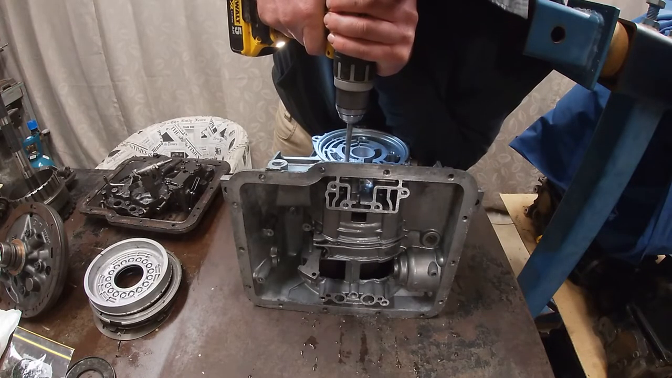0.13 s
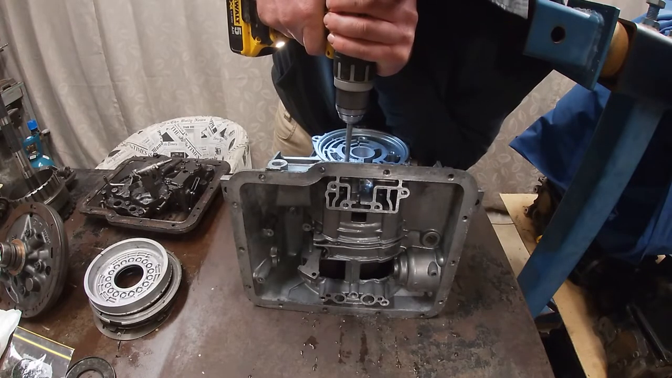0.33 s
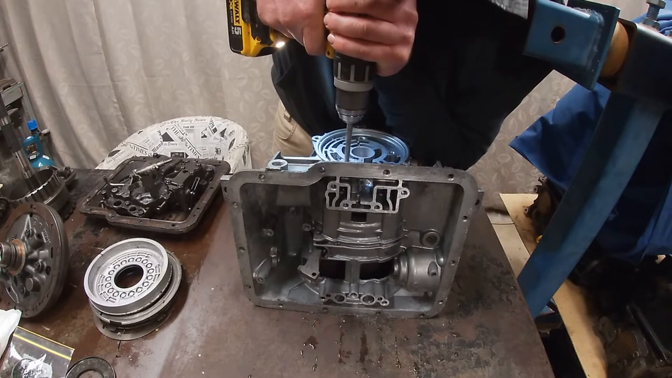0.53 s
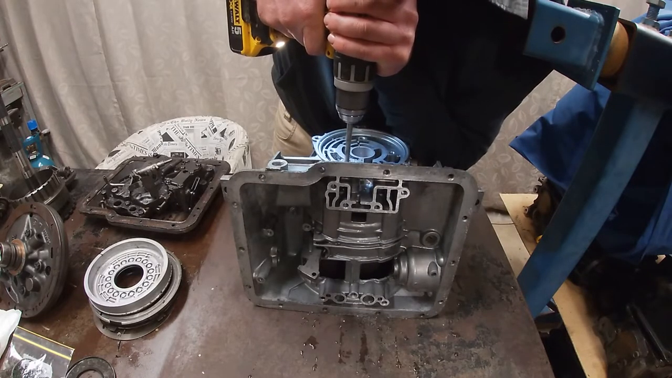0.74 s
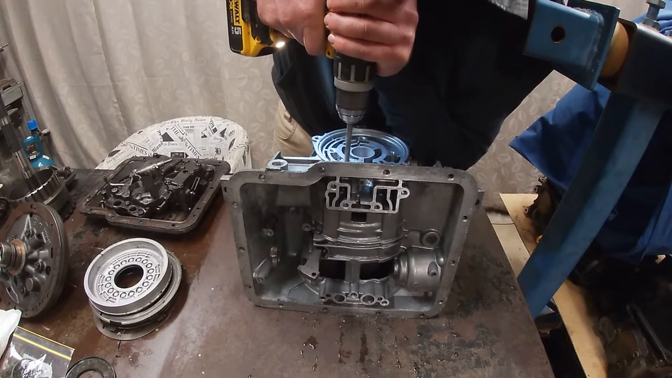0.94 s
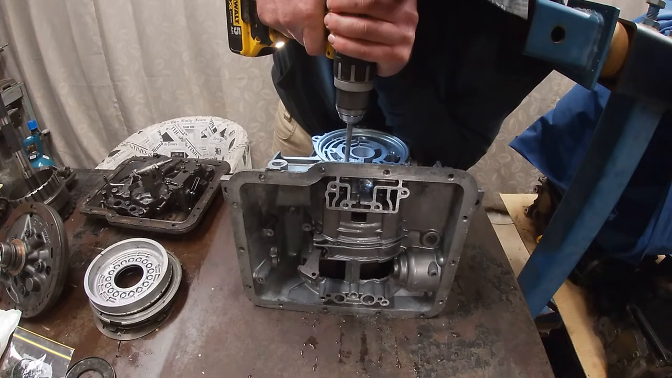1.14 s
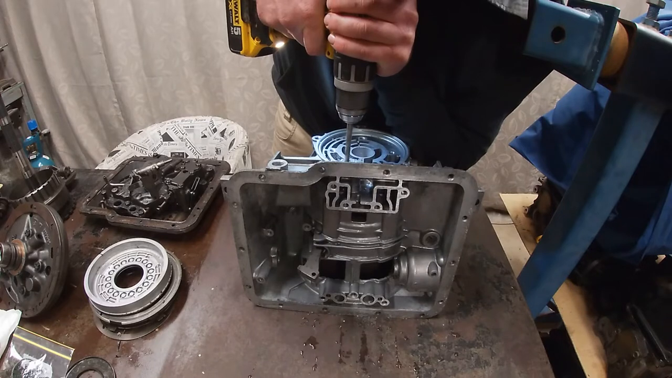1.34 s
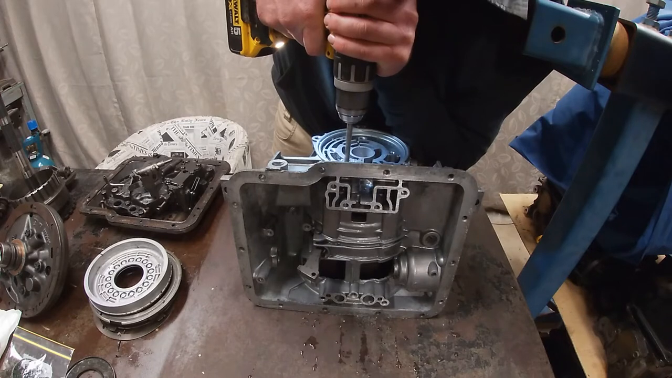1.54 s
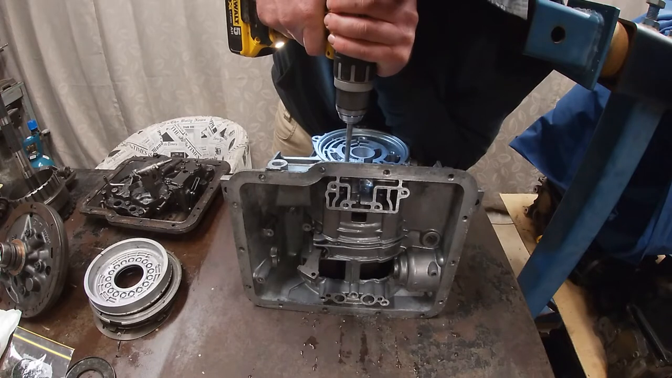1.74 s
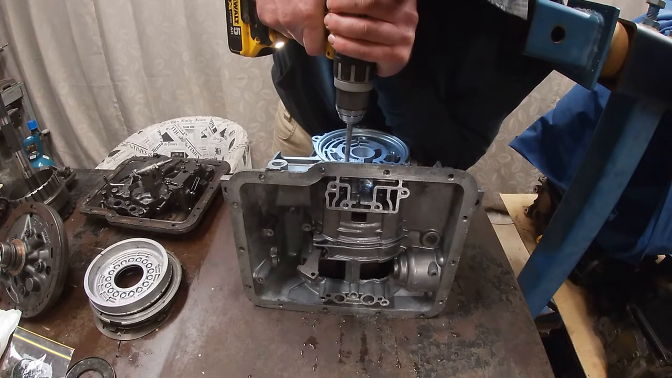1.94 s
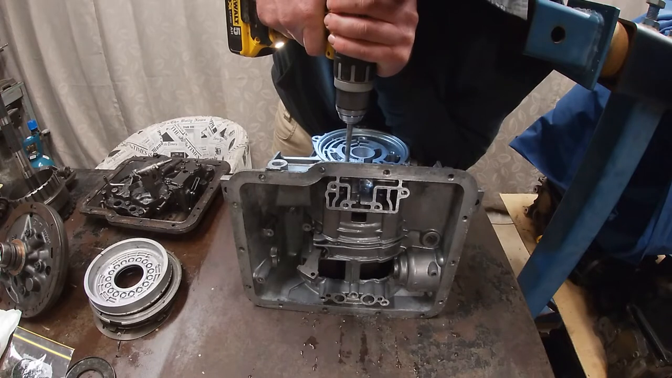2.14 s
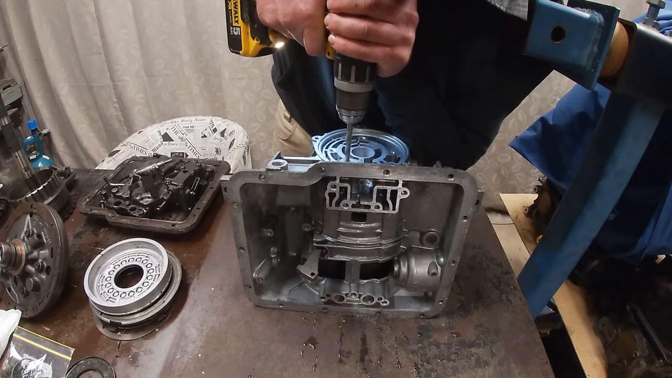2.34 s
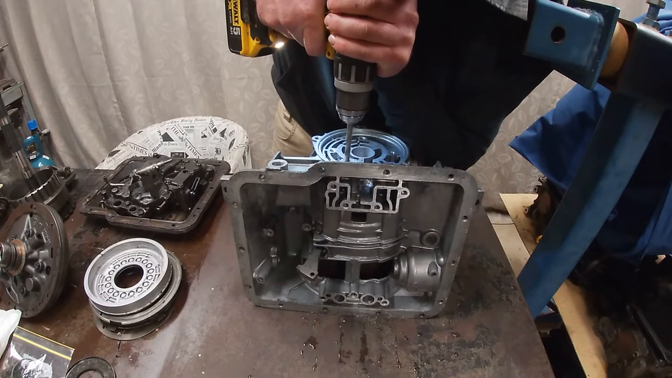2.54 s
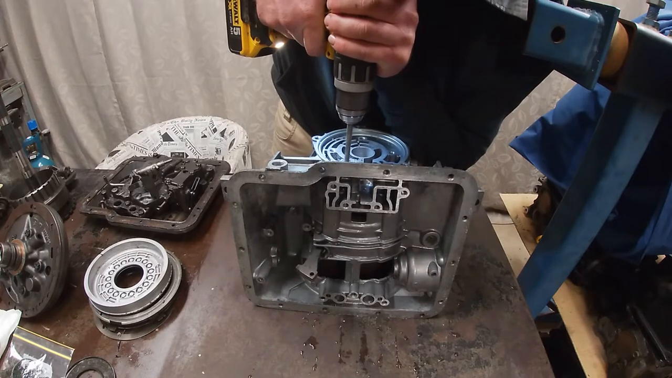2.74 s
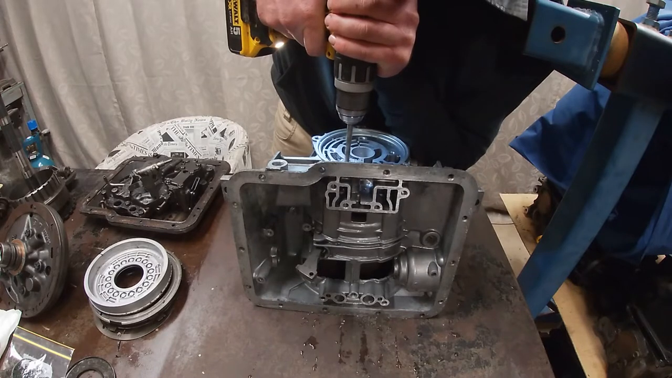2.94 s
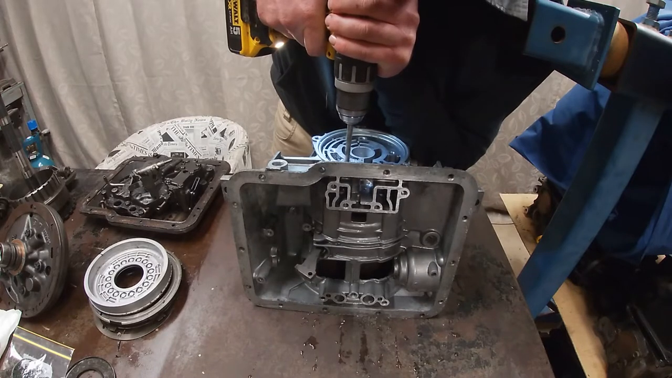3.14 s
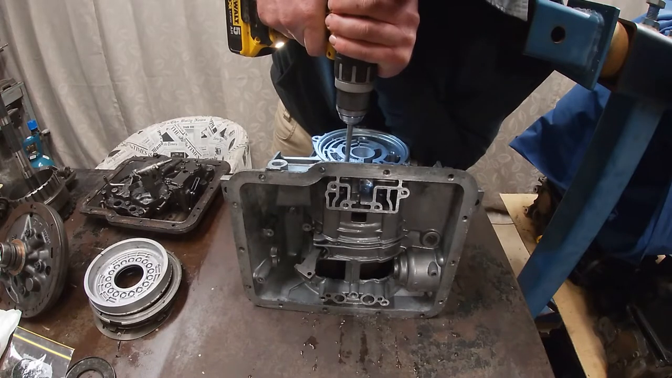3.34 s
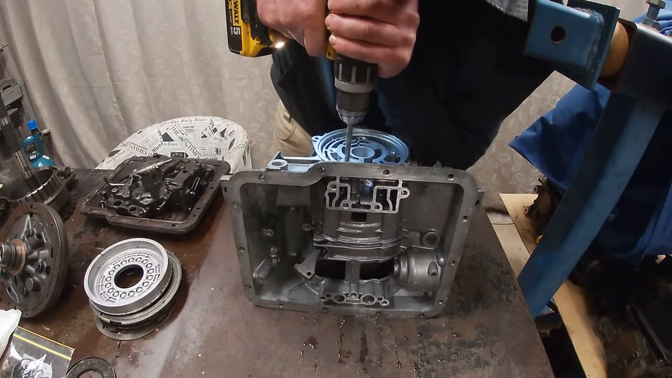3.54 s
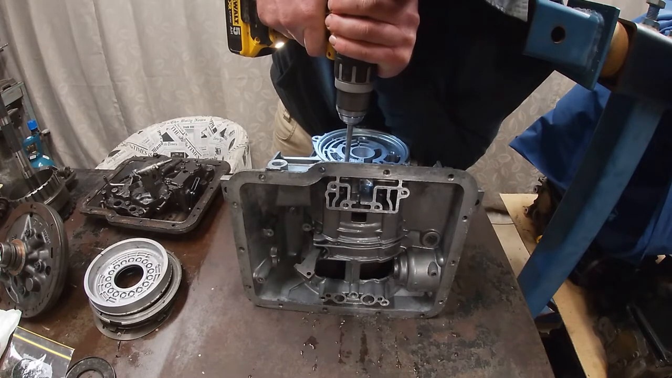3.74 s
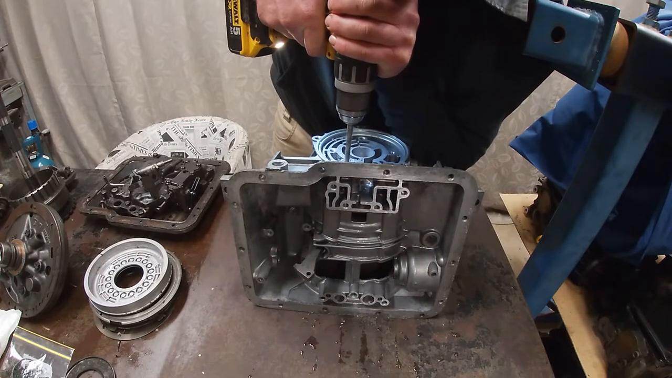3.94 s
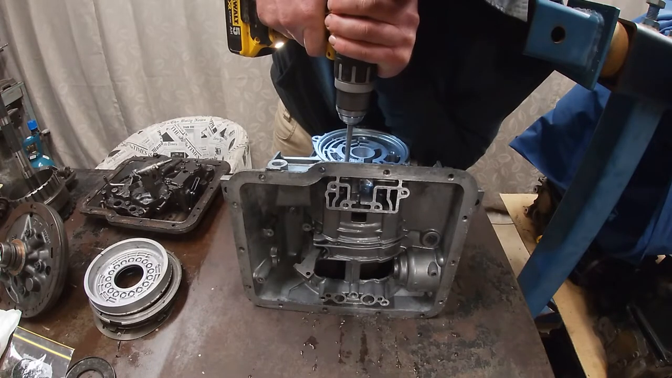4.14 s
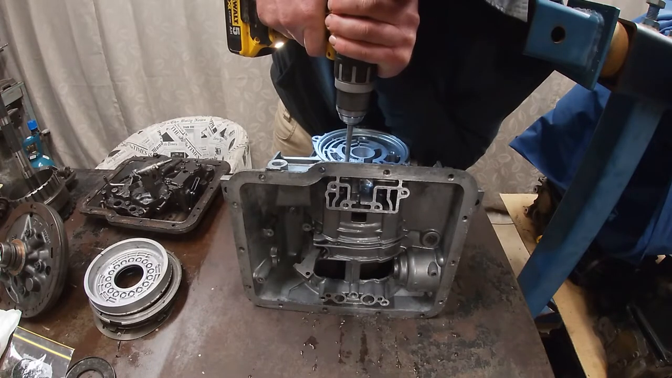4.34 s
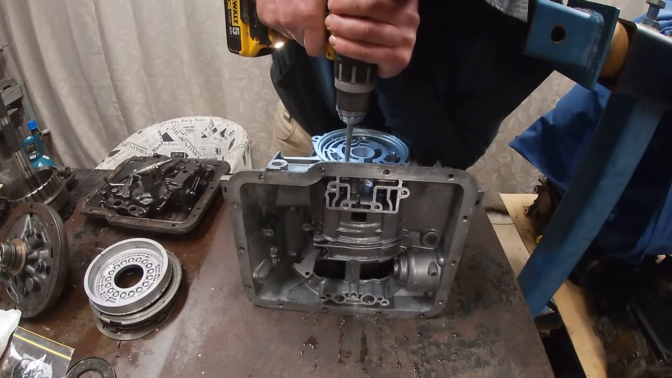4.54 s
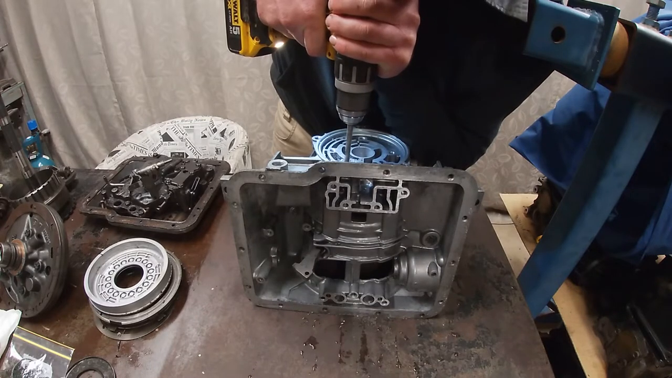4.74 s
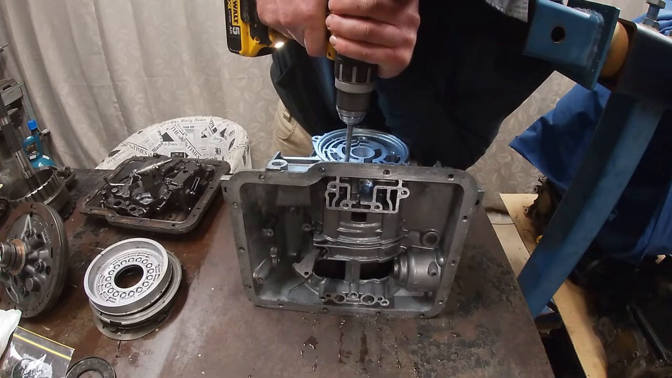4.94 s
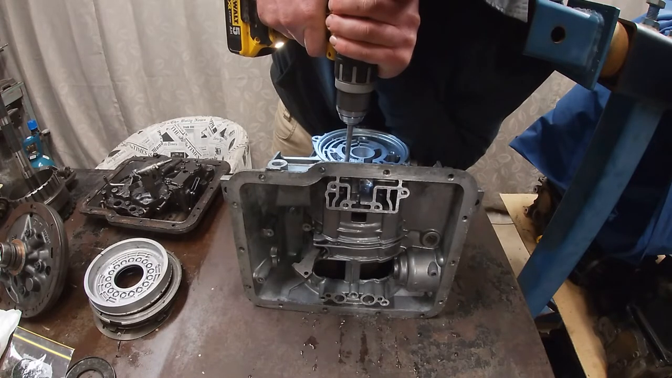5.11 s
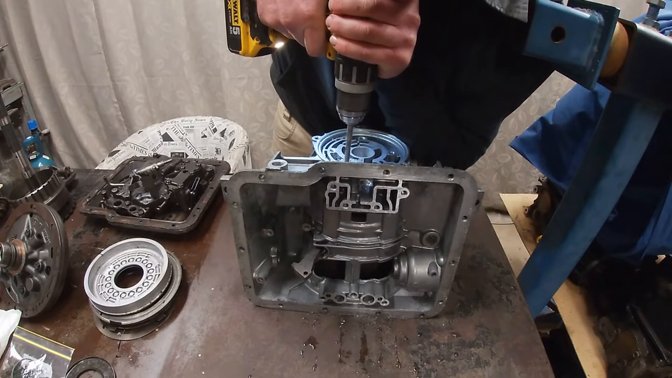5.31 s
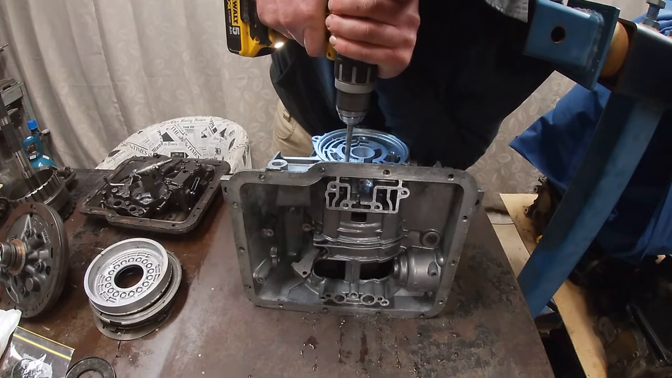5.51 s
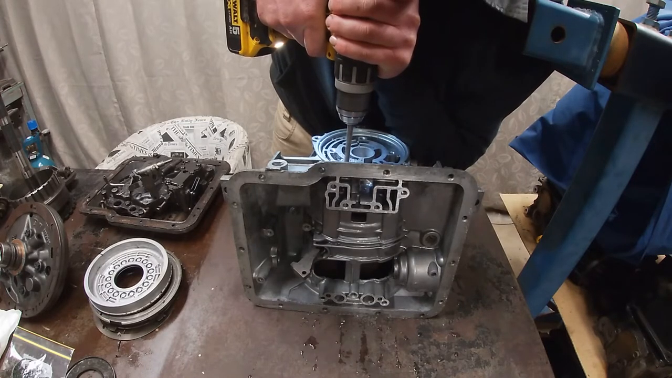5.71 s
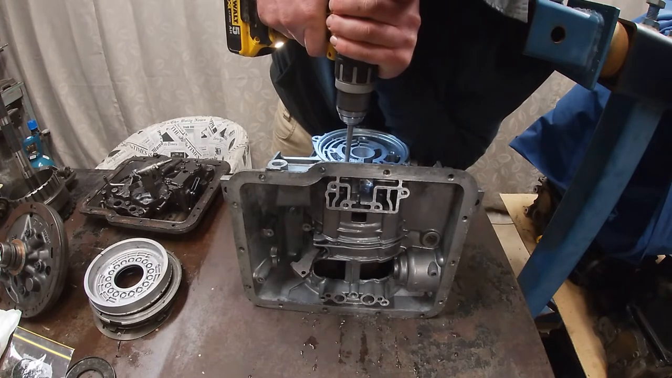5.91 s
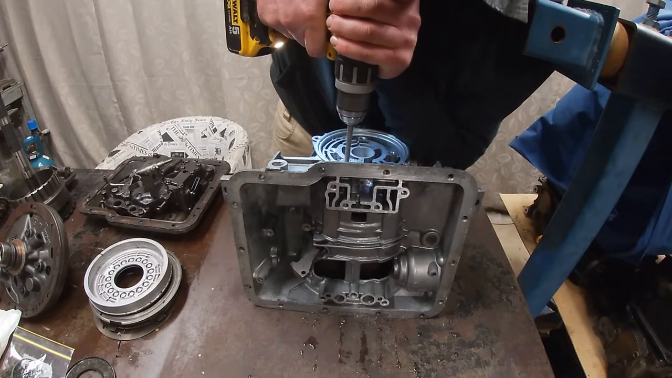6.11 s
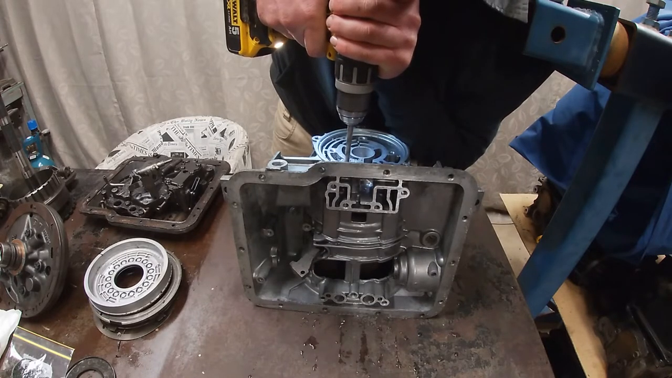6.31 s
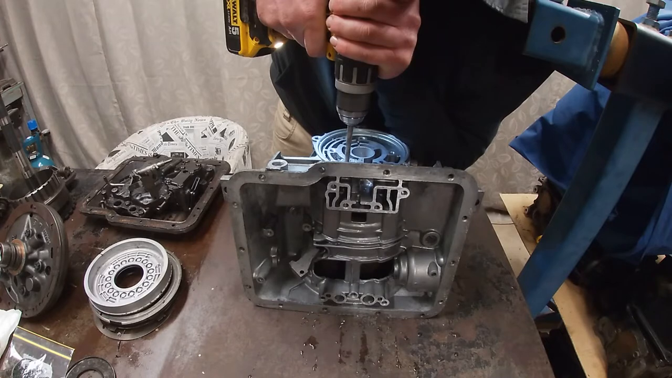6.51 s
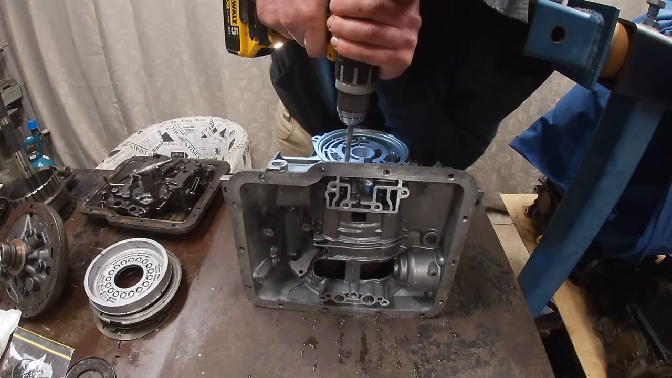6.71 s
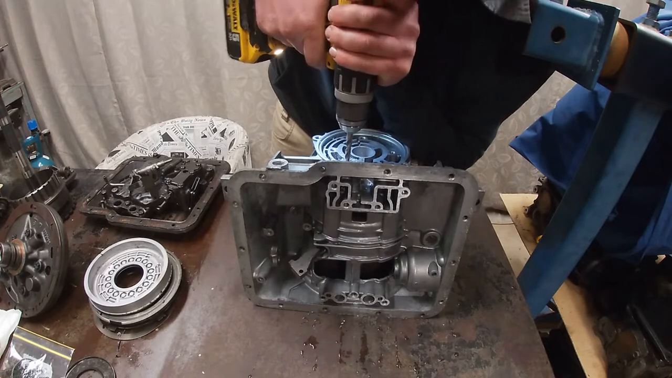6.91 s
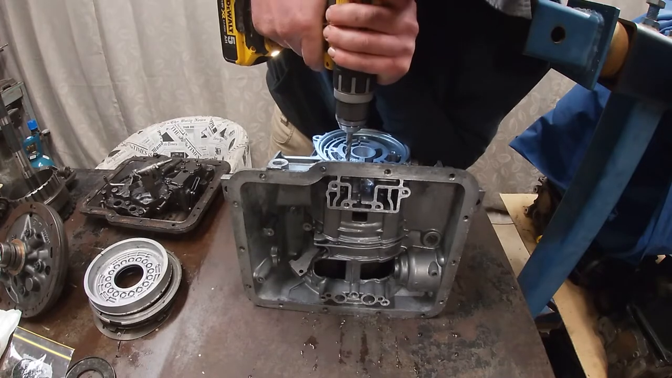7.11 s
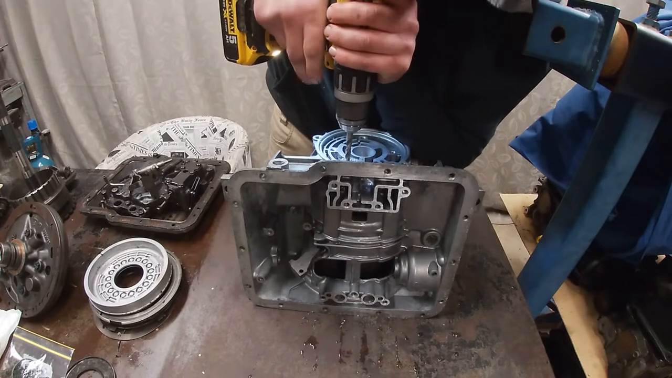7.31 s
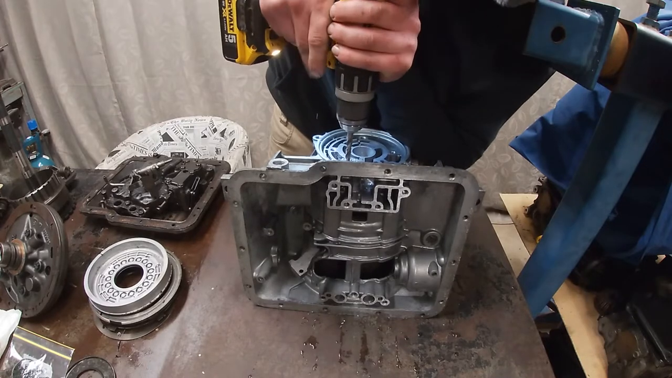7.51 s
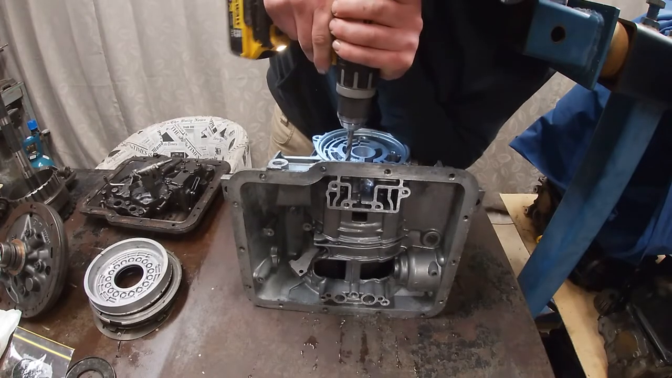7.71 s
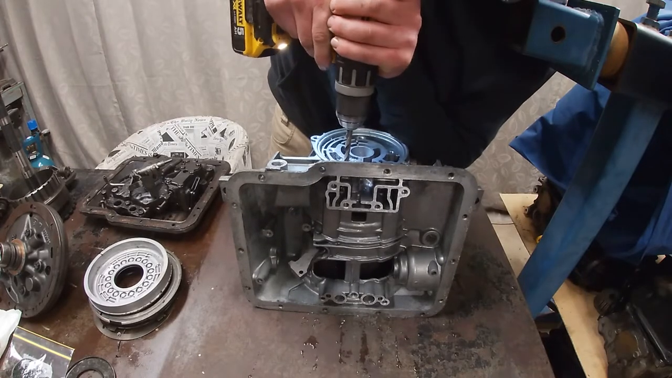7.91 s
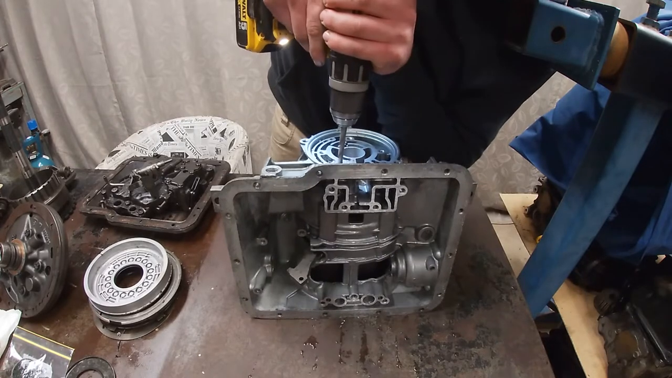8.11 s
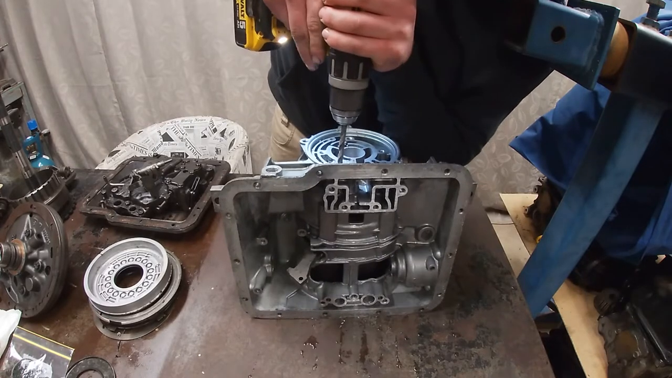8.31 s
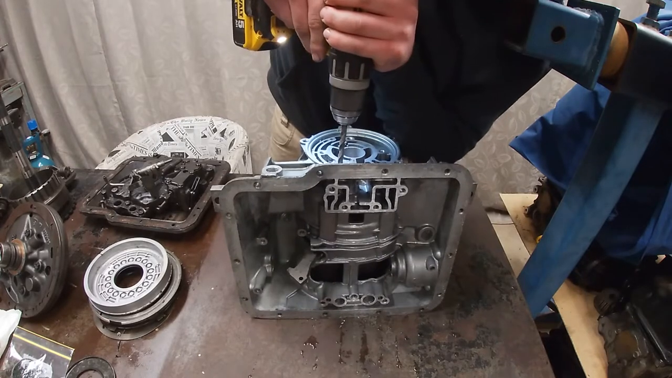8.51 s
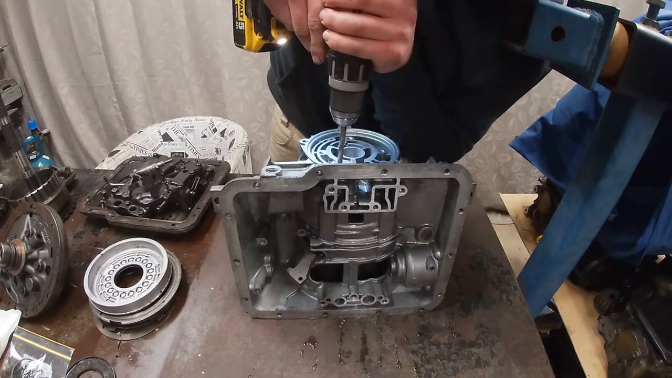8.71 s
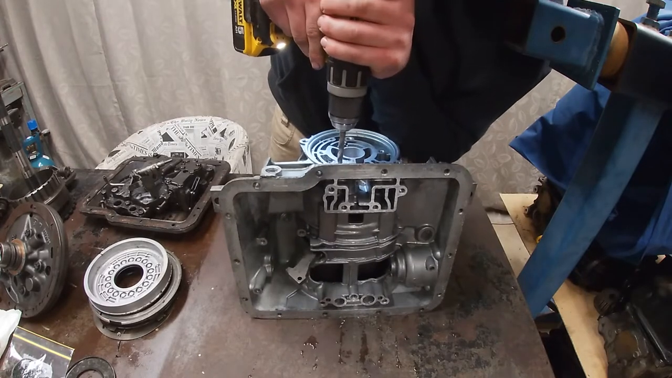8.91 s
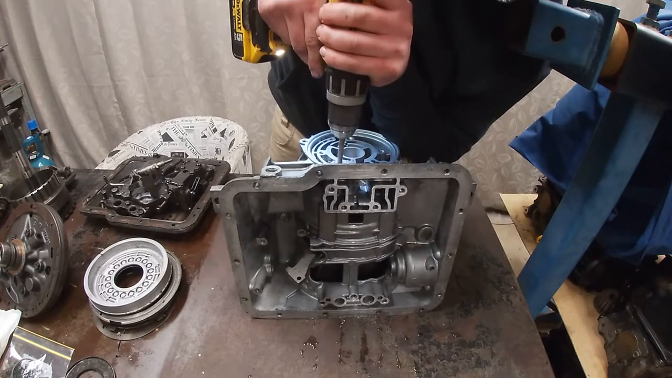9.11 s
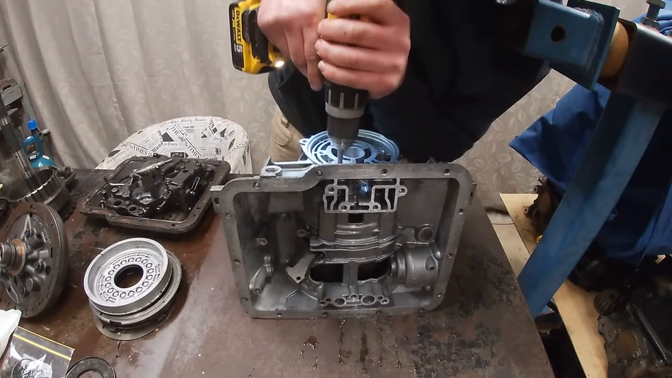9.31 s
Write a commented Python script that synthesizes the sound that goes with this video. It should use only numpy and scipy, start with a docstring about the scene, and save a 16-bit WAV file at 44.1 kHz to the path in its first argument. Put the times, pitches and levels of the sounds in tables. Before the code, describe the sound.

A labouring drill motor whines over gritty metal cutting for six seconds, surges free, snags to a stop, then spins in brief rattling bursts with knocks.

```python
"""Close to the microphone, a cordless drill bores a cast aluminium gearbox housing on a bench in a small workshop.
First the motor sags as the bit bites: gear tones whine over a rasp of tiny chip fractures, filtered noise that
rings the modes of the casting, while random shoves drum the bench and a low hum beats with a drone.
Then the bit breaks through, races, snags and stops; last, three short bursts clear the hole, with loose teeth
slapping and metal knocks. Sparse reflections answer from the room, over a steady floor of coloured noise."""
import sys
import numpy as np
from scipy import signal
from scipy.fft import rfft, irfft, next_fast_len
from scipy.io import wavfile

SR = 44100
rng = np.random.default_rng(int(sys.argv[2]) if len(sys.argv) > 2 else 0)


def int16_out(signal):
    """Quantize to a 16-bit WAV file."""
    q = np.round(np.clip(np.atleast_2d(signal).T, -1, 1) * 32767)
    wavfile.write(sys.argv[1], SR, q.astype(np.int16))


N = 412335
TIME = np.arange(N) / SR  # [s]

# background noise of the place: (frequency [Hz], relative density [dB per Hz])
FLOOR = [(25, -16.5), (45, -10.5), (72, -0.5), (115, -15), (180, -11.5), (500, -32), (1400, -33),
         (6000, -40), (10000, -51), (15000, -83)]
FLOOR_DB = -52  # rms
# decay of the workshop: (frequency [Hz], time to fall by 60 dB [s])
ROOM = [(150, 0.47), (1000, 0.68), (3000, 0.43), (7500, 0.33), (15000, 0.39)]
EDGE_HZ = 15700  # upper band limit of the recorder

# modes of the housing on the bench: (frequency [Hz], width [Hz], relative level [dB])
BENCH = [(63.7, 24, -5), (92.5, 11, -14), (116, 43, -5), (180.7, 18.6, 9.5), (198, 29, 4), (267.8, 23.4, 2),
         (370, 52, -5.5), (524, 73, -8.5), (660, 39, -9)]
# the bit catches and jolts the housing: (time [s], relative level [dB])
JOLTS = [(6.962, -14), (6.979, -12), (7.01, -9.5), (7.842, -11), (7.865, -8), (8.105, -16), (8.53, -36),
         (8.857, -13.5), (8.897, -16), (8.988, -18), (9.233, -5.5), (9.276, -9), (9.323, -6)]

# knocks of the bit, chuck and trigger:
# (time [s], relative crack level [dB], treble against middle [dB per decade], relative handle thud [dB])
KNOCKS = [(7.423, -31, 2, -40), (7.483, -21, -4, -42), (7.52, -10, -1, -24), (7.665, -23.5, -16, -40.5),
          (7.784, -29, 8.5, -43), (7.789, -13.5, 21, -18), (7.81, -13, 8, -28), (7.839, 0, 20, -11),
          (7.863, -10, 0, -14), (8.024, -21.5, 13, -27), (8.059, -23, 5, -35), (8.065, -16, 0, -39),
          (8.077, -18.5, 2, -35), (8.098, -12.5, -9, -18), (8.226, -4, 25, -30), (8.477, -13.5, 7, -35),
          (8.521, -23, 1, -47), (8.738, -22, 10, -35), (8.744, -9, 18, -21), (8.773, -8.5, 5, -18),
          (8.887, -9, 13, -18)]
# colour of a knock before its own brightness: (frequency [Hz], relative density [dB per Hz])
KNOCK_COLOUR = [(200, -8), (900, -16), (2000, 13), (3200, 8.5), (5000, 5), (7400, -0.5), (9000, -12.5),
                (15000, -105)]
# modes of the bit and chuck when tapped: (frequency [Hz], width [Hz], relative level [dB])
TOOL = [(1938, 200, -1), (2450, 300, -2), (2993, 90, -3), (3930, 200, -6), (5233, 150, -6), (6650, 120, -7)]
# modes of the plastic handle: (frequency [Hz], width [Hz], relative level [dB])
HANDLE = [(273, 50, 4), (620, 83, -1), (1150, 42, 7)]

# the bit squeals against the wall of the hole:
# (start [s], length [s], frequency [Hz], slide [Hz per s], relative level [dB])
SQUEALS = [(.03, .22, 6075, 0, -28), (2.08, .16, 5020, 0, -34), (3.44, .1, 5020, 0, -29),
           (3.83, .11, 5020, 0, -31), (4.2, .15, 6060, 0, -28), (4.48, .14, 6060, 0, -27),
           (6.26, .2, 5020, 0, -33), (6.82, .12, 5020, 0, -33), (6.918, .025, 4450, 0, -25),
           (7.84, .05, 2550, 0, -28), (8.17, .075, 6120, -1800, -25), (8.182, .03, 6100, -45000, -27),
           (1.16, .025, 12100, 0, -50)]
# spells in which the chip chirps thinly: (start [s], length [s], level [dB])
CHIRPS = [(2.75, 1.2, -55), (4.75, 0.67, -51), (5.3, 0.75, -45.5)]
CHIRP_HZ = 9950

# colour of loose teeth slapping: (frequency [Hz], relative density [dB per Hz])
SLAP_COLOUR = [(300, -6), (1300, -1), (3000, 3), (6000, -10), (7800, -19), (10000, -19), (15000, -53)]
# colour of the rasp: (frequency [Hz], relative density [dB per Hz])
RASP = [(200, -9.5), (330, -1.5), (470, -5), (650, 2), (850, -2), (1500, 2), (2400, -1), (3100, 5.5),
        (4500, 6), (5800, 5.5), (6600, 4.5), (7100, 2), (7600, -1.5), (8300, -8), (10500, -24.5),
        (15500, -35.5)]
# modes of the casting: (frequency [Hz], width [Hz], relative level [dB])
CASTING = [(991, 60, -2), (2230, 45, -4.5), (2550, 40, 1), (3000, 150, -1), (4440, 160, 1), (4730, 40, -1),
           (4908, 25, -6.5), (5020, 18, -3), (5240, 70, 0), (6060, 26, 0.5), (6220, 300, -1),
           (7330, 280, 5)]
WANDER_DB = 1.8  # rms swing of each casting mode as the contact shifts

# rotor speed while boring under load: (time [s], rotor speed [Hz])
BORING = [(0.0, 395.7), (0.185, 398.8), (0.579, 387.3), (0.708, 397.8), (0.963, 400.4), (1.048, 397.3),
          (1.098, 388.4), (1.257, 393.0), (1.362, 380.9), (1.606, 388.3), (1.701, 383.0), (1.726, 387.3),
          (2.09, 389.6), (2.22, 373.9), (2.36, 369.4), (2.539, 374.1), (2.599, 372.1), (2.744, 393.5),
          (2.893, 401.1), (3.033, 393.8), (3.098, 383.8), (3.298, 377.0), (3.387, 385.8), (3.497, 377.5),
          (3.672, 376.8), (3.756, 369.4), (3.826, 370.1), (3.951, 386.8), (4.146, 405.5), (4.315, 411.1),
          (4.679, 411.8), (4.799, 406.0), (4.869, 384.0), (4.994, 370.6), (5.123, 365.4), (5.208, 367.7),
          (5.363, 388.0), (5.722, 400.4), (5.907, 396.1), (5.956, 388.4)]
BREAK_S = BORING[-1][0]  # the bit is about to come through
# the harder the bit is pressed, the more the motor sags below its usual speed and the louder the cut
USUAL_HZ, BITE_DB_PER_HZ = 360, 0.0139
BORE_RASP_DB, BORE_SHAKE_DB = -25.5, -36.5  # at the usual speed
# the bit breaks through, races and snags:
# (time [s], rotor speed [Hz], rasp level [dB], shaking of the bench [dB])
BREAKTHROUGH = [(5.975, 389.5, -24.5, -32), (6.004, 496, -24.5, -24), (6.052, 553.4, -23.5, -32),
                (6.196, 558.3, -24.5, -31), (6.302, 471.7, -26, -37), (6.374, 388, -27.5, -36),
                (6.44, 323.7, -28.5, -31.5), (6.486, 268.7, -29.5, -37), (6.52, 355.7, -28, -41),
                (6.574, 406.3, -26, -45), (6.662, 401, -26, -44), (6.716, 354, -25.5, -31),
                (6.76, 340.7, -26.5, -30.5), (6.92, 318.7, -23, -30)]
# the trigger is squeezed, eased or let go (near 0 Hz), or the bit snags:
# (time [s], time to settle [s], rotor speed [Hz], rasp level [dB], shaking of the bench [dB])
TRIGGER = [(6.92, 0.13, 0.5, -14.5, -2), (7.803, 0.06, 420, -29.5, -44), (7.863, 0.075, -0.5, -27.5, -8.5),
           (8.099, 0.087, 539, -22.5, -34), (8.185, 0.026, 330, -26, -25.5), (8.208, 0.076, 390, -25, -29),
           (8.272, 0.068, 390, -28, -30.5), (8.349, 0.069, -2, -48, -43), (8.761, 0.04, 270, -25.5, -34),
           (8.797, 0.066, 320, -27, -21.5), (8.885, 0.17, 137.5, -23, -19), (9.103, 0.051, 360.5, -26, -42),
           (9.155, .13, 653.5, -23, -32)]
CUTTING_HZ = 340  # rotor speed from which the bit cuts fully
CUTTING_LAW = 0.96  # in a crawling bit the work falls with this power of the speed

# turns of the chuck, and throbs of the gear load, for each turn of the rotor
CHUCK_RATIO, THROB_RATIO = .04058, .02941

# tones of the shaft: (multiple of rotor speed, relative level [dB])
SHAFT = [(1, -16.5), (1.5, -20), (1.773, -27), (2, -29), (2.5, -22), (3, -25), (5, -29)]
# the two flutes load the work at even multiples of chuck speed: (multiple, relative level [dB])
FLUTES = [(2, -5), (4, -3), (8, 1), (16, -9)]
# the flutes push harder as the hole deepens: relative levels
FLUTES_SHALLOW_DB, FLUTES_DEEP_DB = -22.5, -9.5
# how well the housing radiates a hum: (frequency [Hz], gain [dB])
HOUSING = [(60, -8), (135, -12), (160, -4.5), (180, 1), (205, -0.5), (250, -4.5), (278, 3.5), (325, -5)]
# the hum is strong while the hole is shallow, then settles: relative levels
HUM_EARLY_DB, HUM_LATE_DB, HUM_HOLD_S, HUM_FADE_S = -4, -10, 1.1, 0.72
# spells in which the hum swells to a groan: (start [s], length [s], rise [dB])
GROANS = [(.3, 0.44, 5), (4.81, 0.23, 7.5), (5.96, 0.37, 3.5), (6.6, 0.17, 4.5)]
DRONE_ORDER = 11  # multiple of chuck speed; lies just under the hum and beats with it

# tones of the gears: (multiple of rotor speed, relative level under load [dB],
# relative level running free [dB], rise at full strain [dB], unsteadiness [rad rms])
GEARS = [(4, -2.5, -8, 13, .15), (7, -17, -20, 6, .5), (7.51, -16, -20, 6, .9), (8, 0, -1.5, 2, .25),
         (8.53, -17, -20, 6, .7), (11.5, -1, -9, 9, .7), (14.75, -13, -24, 3, .6)]
# how well the gear case radiates a tone: (frequency [Hz], gain [dB])
GEAR_CASE = [(300, -15), (1100, -4.5), (1550, -7), (1900, -3), (2200, 1), (2600, 2.5), (2950, 4),
             (3100, 3.5), (3200, 4), (3290, 0), (3800, 0), (4500, -6), (5600, -8), (6300, -1), (6900, 1),
             (7500, 9), (8300, -12), (10000, -40)]
# spells in which the main mesh stands out or sinks into the grinding: (start [s], length [s], change [dB])
WHINE_SPELLS = [(6.22, .16, 3), (6.39, .13, -4), (6.94, .035, 4.5), (8.2, .2, -2.5), (8.76, .28, 3.5),
                (9.1, .05, -4)]
# spells in which a higher gear tone sings out: (start [s], length [s], level against the rasp [dB])
HIGH_WHINES = [(6.425, .11, 1), (6.52, .15, -6), (8.21, .11, -7)]
MESH_ORDER, HIGH_ORDER = 8, 15.4  # multiples of rotor speed
STRAIN_HZ_PER_S = 9000  # acceleration that gives full strain
FITS_DB = 2.2  # rms coming and going of each tone of the free-running gears
THROB_DEPTH, THROB_LEAD = .9, .05  # share of the main mesh power; part of a throb cycle


def gain_of(db):
    """Decibels to gain."""
    return 10 ** (np.asarray(db) / 20)


def evened(x):
    """Scales to an rms of 1."""
    return x / np.sqrt(np.mean(x ** 2) + 1e-20)


def read(points, hz):
    """Reads a spectrum on a log-frequency axis."""
    f, value = np.transpose(points)
    return np.interp(np.log(hz + 1), np.log(f + 1), value)


def follow(rows):
    """Each column of a curve table at every sample."""
    s, *columns = np.transpose(rows)
    return [np.interp(TIME, s, c) for c in columns]


def add(mix, s, sound):
    """Lays a sound into the mix at time s."""
    part = mix[round(s * SR):][:len(sound)]
    part += sound[:len(part)]


def coloured(x, points):
    """Gives x a spectrum, at an rms of 1."""
    size = next_fast_len(len(x))
    colour = gain_of(read(points, np.fft.rfftfreq(size, 1 / SR)))
    return evened(irfft(rfft(x, size) * colour, size)[:len(x)])


def waver(hz):
    """Smooth chance of rms 1, moving up to about hz times a second."""
    lowpass = signal.butter(2, hz, fs=SR, output="sos")
    return evened(signal.sosfilt(lowpass, rng.standard_normal(N)))


def swell(s, length):
    """A half sine that rises at time s and is over after length seconds."""
    return np.sin(np.pi * np.clip((TIME - s) / length, 0, 1))


def ring(modes):
    """Response of a body to one tap: decaying modes of alternating polarity, their energies set by their dB."""
    t = TIME[:SR // 2]
    tap = 0
    for k, (hz, width, db) in enumerate(modes):
        size = (-1) ** k * gain_of(db) * np.sqrt(abs(width))
        tap = tap + size * np.exp(-np.pi * abs(width) * t) * np.sin(2 * np.pi * hz * t)
    return tap / np.linalg.norm(tap)


def through(x, response):
    """Plays x through a body or a room."""
    return signal.oaconvolve(x, response)[:N]


def tone(turns, unsteady):
    """A line of rms 1 whose phase wanders, smearing its pitch."""
    return np.sqrt(2) * np.sin(2 * np.pi * turns + 2 * np.pi * rng.random() + unsteady * waver(hz=22.3))


def slack():
    """0 while the bit is pressed into the metal, 1 once it is through."""
    return np.clip((TIME - BREAK_S) / .1, 0, 1)


def drive():
    """Rotor speed and gains of rasp and shaking: set curves for boring and breakthrough, then trigger moves."""
    boring = []
    for s, hz in BORING:
        bite_db = BITE_DB_PER_HZ * (USUAL_HZ - hz)
        boring.append((s, hz, BORE_RASP_DB + bite_db, BORE_SHAKE_DB + bite_db))
    state = np.array(follow(boring + list(BREAKTHROUGH)))
    for s, settle, *goal in TRIGGER:
        eased = 1 - (1 - np.clip((TIME - s) / settle, 0, 1)) ** 2
        state = state + eased * (np.array(goal)[:, None] - state)
    speed, rasp_db, shake_db = state
    cuts = np.clip(speed / CUTTING_HZ, 0, 1) ** CUTTING_LAW  # a crawling bit hardly cuts
    return np.maximum(speed, 1), cuts * gain_of(rasp_db), cuts * gain_of(shake_db)


def background():
    """The steady floor of the place: noise weighted to the bass."""
    return gain_of(FLOOR_DB) * coloured(rng.standard_normal(N), FLOOR)


def workshop(x, wet_db=-9):
    """Sparse reflections of random sign, each band dying at its own speed."""
    count = SR // 2
    hits = (rng.random(count) < 3000 / SR) * (TIME[:count] > .004)  # 3000 a second, after 4 ms
    taps = rng.choice([-1., 1.], count) * hits
    hz, t, bands = signal.stft(taps, SR, nperseg=256)
    decay = gain_of(-60 * t / read(ROOM, hz)[:, None])
    tail = signal.istft(bands * decay, SR, nperseg=256)[1]
    wet = gain_of(wet_db) * through(x, tail / np.linalg.norm(tail))
    return (x + wet) / np.hypot(1, gain_of(wet_db))


def bench(shake, jolt_db=20, lowest_hz=90):
    """Uneven shoves and hard catches of the bit drum the housing on the bench, which radiates little deep bass."""
    kicks = rng.standard_normal(N) * (rng.random(N) < 300 / SR)  # about 300 a second
    shoves = evened(kicks) * shake
    for s, db in JOLTS:
        add(shoves, s, gain_of([db + jolt_db]))
    highpass = signal.butter(2, lowest_hz, "high", fs=SR, output="sos")
    return through(signal.sosfilt(highpass, shoves), ring(BENCH))


def knocks(crack_s=0.0022, rise_s=0.00065, crack_db=-7, ring_db=-19, thud_db=6):
    """Steel taps metal: a short crack, after which the bit and chuck ring and the plastic handle thuds."""
    t, cracks, pushes = TIME[:2048], np.zeros(N), np.zeros(N)
    envelope = np.exp(-t / crack_s) * (1 - np.exp(-t / rise_s))
    for s, db, bright_db, body_db in KNOCKS:
        colour = [(hz, level + bright_db * np.log10(hz / 3000)) for hz, level in KNOCK_COLOUR]
        add(cracks, s, gain_of(db) * coloured(rng.standard_normal(len(t)), colour) * envelope)
        add(pushes, s, gain_of([body_db + thud_db]))
    ringing = gain_of(ring_db) * through(cracks, ring(TOOL))
    return gain_of(crack_db) * cracks + ringing + through(pushes, ring(HANDLE))


def squeals(turns, squeal_db=-1):
    """The bit rubs the wall of the hole and sings in fits; the chip chirps once in each turn of the chuck."""
    catch = np.cos(np.pi * CHUCK_RATIO * turns) ** 4
    spells = sum(gain_of(db) * swell(s, length) for s, length, db in CHIRPS)
    out = catch * spells * tone(CHIRP_HZ * TIME + .2 * waver(hz=120), unsteady=1)
    slip = .6 * waver(hz=30)  # [rad]
    for s, length, hz, slide, db in SQUEALS:
        since = TIME - s
        cycles = (hz + slide * since / 2) * since
        level = gain_of(db + squeal_db) * swell(s, length)
        out = out + level * np.sqrt(2) * np.sin(2 * np.pi * cycles + slip)
    return out


def clatter(turns, speed, rasp, clatter_db=-5, idle_share=0.53):
    """Loose teeth slap once a rotor turn with uneven force, hardest while the motor speeds up or brakes."""
    jerk = np.clip(abs(np.gradient(speed)) * SR / STRAIN_HZ_PER_S, 0, 1)
    slaps = np.diff(np.floor(turns), prepend=0) * rng.rayleigh(1, N)
    slap = coloured(rng.standard_normal(128), SLAP_COLOUR) * np.hanning(128) ** 2
    level = gain_of(clatter_db) * rasp * slack() * (idle_share + jerk)
    return level * evened(through(slaps, slap))


def fizz(rasp, fizz_db=-39):
    """Faint hiss above 10 kHz that follows the rasp level, drawn separately for each side."""
    colour = [(10200, -45), (12000, 12), (15500, 0.0)]  # (frequency [Hz], relative density [dB per Hz])
    sides = [coloured(rng.standard_normal(N), colour) for side in range(2)]
    return gain_of(fizz_db) * rasp * np.array(sides)


def snaps(grain_db=0.3):
    """Dense tiny fractures of the chip, a few larger than the rest."""
    sizes = gain_of(grain_db * np.minimum(rng.exponential(1, N), 5))
    breaks = rng.random(N) < 12000 / SR  # about 12000 a second
    return coloured(rng.standard_normal(N) * breaks * sizes, RASP)


def cutting(turns, rasp, throb, rasp_db=0.16, ring_db=-8.5, tooth_depth=0.24):
    """Chips tear off, pulsing with the rotor; they hiss directly and ring the casting, whose modes come and go."""
    pulse = 1 + tooth_depth * np.cos(2 * np.pi * turns)
    force = rasp * pulse * gain_of(0.033 * throb + 0.56 * waver(hz=58.6))
    chips = force * snaps()
    shares = gain_of([db for hz, width, db in CASTING])
    ringing = 0
    for share, mode in zip(shares, CASTING):
        contact = gain_of(WANDER_DB * waver(hz=5))
        ringing = ringing + share * through(chips * contact, ring([mode]))
    hiss = force * snaps()  # its own fractures, apart from those that ring
    return gain_of(rasp_db) * hiss + gain_of(ring_db) * ringing / np.linalg.norm(shares)


def shaft(turns, speed, rasp, shaft_db=-0.5, drone_db=-7):
    """Imbalance of the rotor (strongest under load), the beating hum of the drive and the slow push of the flutes."""
    orders = sum(gain_of(db + 1.8 * waver(hz=2)) * tone(k * turns, unsteady=.25) for k, db in SHAFT)

    settled = np.clip((TIME - HUM_HOLD_S) / HUM_FADE_S, 0, 1)
    hum_db = HUM_EARLY_DB + settled * (HUM_LATE_DB - HUM_EARLY_DB) + read(HOUSING, speed / 2)
    groan_db = sum(db * swell(s, length) for s, length, db in GROANS)
    hum = gain_of(hum_db + groan_db + 2.1 * waver(hz=8.2)) * tone(turns / 2, unsteady=0.053)
    drone_gain = gain_of(hum_db + drone_db + 2.0 * waver(hz=7.2))
    drone = drone_gain * tone(DRONE_ORDER * CHUCK_RATIO * turns, unsteady=0.44)

    depth = np.minimum(TIME / BREAK_S, 1)
    push_db = FLUTES_SHALLOW_DB + depth * (FLUTES_DEEP_DB - FLUTES_SHALLOW_DB)
    push = gain_of(groan_db * slack() + push_db)
    flutes = 0
    for k, db in FLUTES:
        order = k * CHUCK_RATIO
        flutes = flutes + gain_of(db + read(HOUSING, order * speed)) * tone(order * turns, unsteady=0.079)

    loaded = 1 - .88 * slack()
    return rasp * (loaded * (gain_of(shaft_db) * orders + drone) + push * flutes + hum)


def gears(turns, speed, rasp, throb, gears_db=-4.0):
    """Meshing teeth sing through the gear case, the main mesh throbbing under load; unloaded, they rattle in fits."""
    free = slack()
    strain = np.clip(np.gradient(speed) * SR / STRAIN_HZ_PER_S, 0, 1)  # only while gaining speed
    rattle = (.14 + free * .5 + .4 * strain) / (2 * np.pi)  # [cycles]
    pulsing = np.sqrt(.7 * (1 + THROB_DEPTH * (1 - free) * throb))
    grit = 1 + (.35 * free + .4 * strain) * waver(hz=350)
    spell_db = sum(db * swell(s, length) for s, length, db in WHINE_SPELLS)
    whine = 0
    for k, loaded_db, free_db, strain_db, play in GEARS:
        line = tone(k * turns + rattle * min(k / MESH_ORDER, 1) * waver(hz=141.53), play)
        db = loaded_db + free * (free_db - loaded_db + FITS_DB * waver(hz=30))
        db = db + strain_db * strain + read(GEAR_CASE, k * speed)
        if k == MESH_ORDER:
            line = line * pulsing * gain_of(spell_db)
        whine = whine + gain_of(db) * line
    spells = sum(gain_of(db) * swell(s, length) for s, length, db in HIGH_WHINES)
    high = spells * tone(HIGH_ORDER * turns + rattle * waver(hz=141.53), unsteady=.6)
    return rasp * grit * (gain_of(gears_db) * whine + high)


def scene():
    """One rotor drives everything; its load throbs about eleven times a second in the bore, its tones almost dry."""
    speed, rasp, shake = drive()
    turns = np.cumsum(speed * (1 + 0.00148 * waver(hz=14.1))) / SR
    throb = np.sin(2 * np.pi * (THROB_RATIO * turns + THROB_LEAD))
    work = bench(shake) + knocks() + squeals(turns)
    work = work + clatter(turns, speed, rasp) + cutting(turns, rasp, throb)
    drill = shaft(turns, speed, rasp) + gears(turns, speed, rasp, throb)
    return background() + workshop(work) + workshop(drill, wet_db=-18) + fizz(rasp)


def record(dry):
    """The band limit of the recorder, a steep low-pass on both sides."""
    lowpass = signal.firwin(511, EDGE_HZ, window=("kaiser", 9), fs=SR)
    return signal.oaconvolve(dry, lowpass[None], "same")


dry = scene()
out = record(dry)
int16_out(out)
```